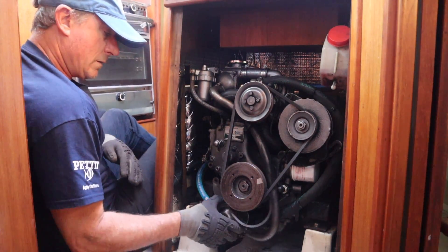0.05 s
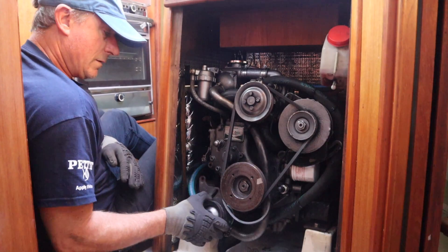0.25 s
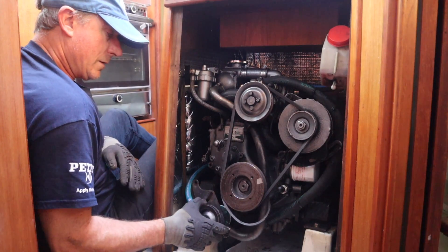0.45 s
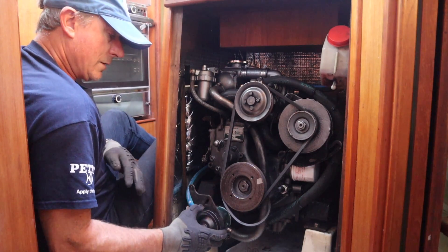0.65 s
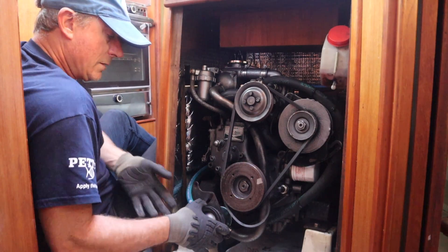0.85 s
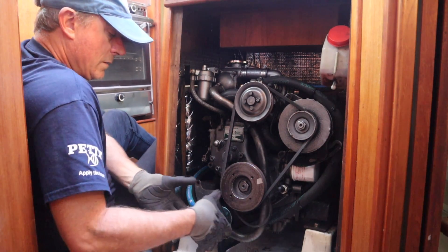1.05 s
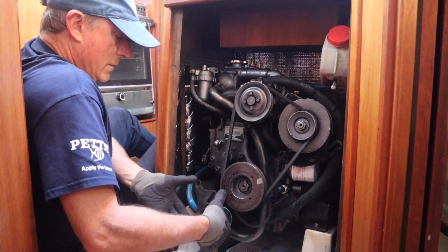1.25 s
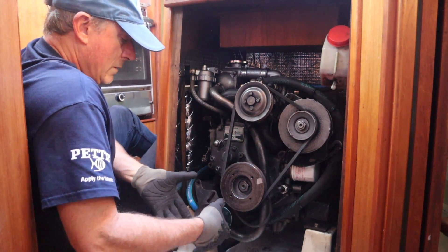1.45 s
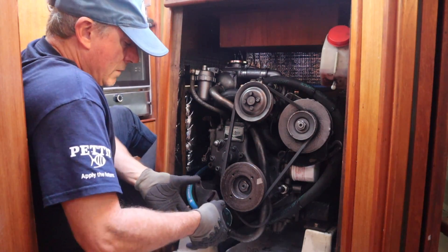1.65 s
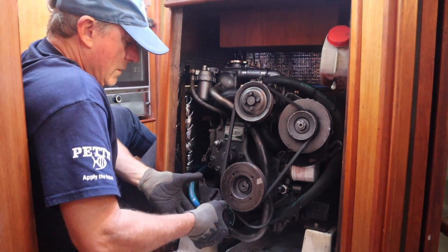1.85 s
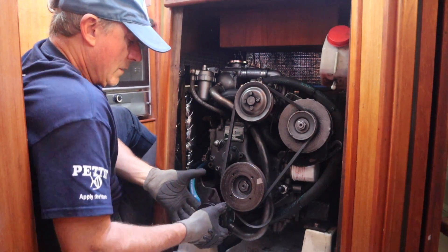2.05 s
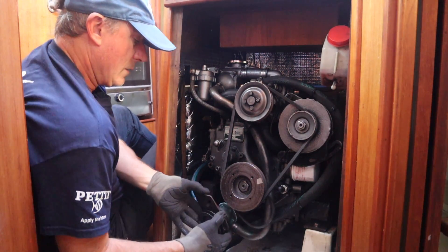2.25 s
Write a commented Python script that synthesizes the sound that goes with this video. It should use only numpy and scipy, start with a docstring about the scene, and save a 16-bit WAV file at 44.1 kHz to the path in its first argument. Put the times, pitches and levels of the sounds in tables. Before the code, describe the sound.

A heavy clunk of a pulley coming free at 0.24 seconds: sharp crack, dull steel ring and deep hollow boom, with loose parts rattling and softer rebounds at 0.37 and 0.44. The short cabin tail fades into low rumble. Gloves rub faintly, soft bumps come near 0.85 and 1.4, a tick at 1.56, then thuds, clicks and juddering rubber scrapes from 1.95 to 2.3.

```python
"""Belt and pulley in a boat cabin

Gloved hands work a belt and pulley off a stopped diesel engine in a wooden boat cabin.
The pulley comes free with a crack (noise burst) and a deep boom of the engine bay (decaying modes).
Metal parts tick (noise puffs, wavering sines), gloves, sleeves and the rubber belt rub (grainy noise),
and soft bumps (short sines) sound over a low noise rumble. The microphone pair is wide in the treble."""
import sys
import numpy as np
from scipy import signal
from scipy.fft import rfft, irfft, next_fast_len
from scipy.io import wavfile
from scipy.ndimage import map_coordinates

SR = 44100
rng = np.random.default_rng(int(sys.argv[2]) if len(sys.argv) > 2 else 0)


def master(y):
    """Save y as 16-bit WAV."""
    cut = np.clip(np.atleast_2d(y).T, -1, 1)
    pcm = np.round(cut * 32767)  # scale
    wavfile.write(sys.argv[1], SR, pcm.astype(np.int16))


N = 101429
T = np.arange(N) / SR  # time [s]

# Spectra are relative: noise is scaled to rms 1 before its level is set.
# Background in the cabin: (frequency [Hz], density [dB per Hz])
FLOOR_SPECTRUM = [(20, -3), (45, -2.5), (72, 3.5), (110, -3.5), (200, -8), (300, -11.5), (600, -14),
                  (1200, -21), (2500, -29), (6000, -39), (11000, -47)]
FLOOR_DB = -43  # before its slow waver

# Gloves and sleeves sliding: (time [s], level before flutter [dB])
RUB_LEVELS = [(0, -63.5), (.1, -55.5), (.17, -53), (.3, -51), (.55, -73), (.75, -59), (.86, -55),
              (.92, -55.5), (1.1, -53), (1.17, -52.5), (1.26, -46.5), (1.39, -47), (1.47, -56.5),
              (1.7, -60.5), (1.77, -50), (1.89, -57.5), (2.02, -53.5), (2.3, -50)]
# Cloth on metal and rubber: (frequency [Hz], density [dB per Hz])
CLOTH_SPECTRUM = [(150, -38), (500, -1.5), (1000, 2.5), (1800, -0.5), (3500, -7), (6000, -14.5),
                  (10500, -19), (13000, -25)]
# Light brushing of the sleeves: (peak time [s], level [dB], rise [s], fall [s])
BRUSH_STROKES = [(.86, -57.5, 0.024, 0.024), (1.05, -55.5, 0.098, 0.075), (1.32, -57, 0.13, 0.051)]
# Fine hiss of the sleeves: (frequency [Hz], density [dB per Hz])
BRUSH_SPECTRUM = [(1000, -22), (4000, 1), (7000, 2), (11000, 0)]

# Light metal contacts: (time [s], puff level [dB], ring [Hz], ring level before wavering [dB], t60 [s])
TICK_CONTACTS = [(0.12, -53.5, 1920, -48, 0.19), (0.147, -50.5, 4440, -46, 0.19),
                 (.216, -46, 7600, -48, 0.099), (0.355, -47, 4350, -54, 0.03),
                 (0.3633, -46.5, 4480, -50, 0.076), (0.475, -50.5, 5340, -57, 0.16),
                 (1.5595, -37, 4360, -45, 0.032), (1.679, -48.5, 7500, -66, 0.038),
                 (1.75, -49, 7500, -61, 0.12), (1.963, -45, 4500, -51, 0.047),
                 (2.1146, -35, 3850, -29.5, 0.01), (2.2344, -34, 4700, -28, 0.0083),
                 (2.275, -42, 5260, -43.5, 0.015)]
# Puff of a metal contact: (frequency [Hz], density [dB per Hz])
TICK_SPECTRUM = [(500, -3), (1500, 2.5), (4000, 0.5), (6000, -2.5), (11000, -3.5)]

# Loose parts rattling: (time [s], level [dB])
RATTLE_HITS = [(.2525, -32), (.2615, -32), (.2655, -34), (.272, -37), (.279, -36), (.3572, -36),
               (.3675, -29), (.1275, -39), (2.052, -45)]
# Colour of the loose parts: (frequency [Hz], density [dB per Hz])
RATTLE_SPECTRUM = [(300, -23), (1000, -1), (2100, 12), (3500, -10), (6000, -13), (11000, -25)]
RATTLE_T60_S = 0.016
RATTLE_ROOM_DB, RATTLE_ROOM_T60_S = -21.5, 0.21  # room level is relative to each hit

KNOCK_S = 0.2368  # the pulley comes free
KNOCK_SIDE_DB = -5  # side gain of rattle, crack and cabin, before the pair's width
# Crack of the blow: (frequency [Hz], density [dB per Hz])
CRACK_SPECTRUM = [(200, -21), (500, 7.5), (1200, -5), (2000, 1.5), (3200, 6), (3700, -5.5), (4300, -1.5),
                  (5500, -13.5), (11000, -27)]
CRACK_DB, CRACK_T60_S = -17, 0.031
# Modes of the engine bay: (frequency [Hz], level before BAY_DB [dB], t60 [s])
BAY_MODES = [(45.9, -21, .47), (47.5, -29.5, .86), (67.7, -10.5, .4), (69.9, -18.5, 1.0), (87.4, -14, .55),
             (92.3, -14.3, .96), (105.7, -10.8, .48), (139, -5.8, .39), (141.8, -19.7, .66),
             (164.3, 1, .16), (185.2, -22.8, .95), (237, -17.5, .22)]
BAY_DB = -0.5
# The slack belt rebounds softly: (time [s], level relative to the main blow [dB])
BELT_REBOUNDS = [(.3697, -16.6), (.4387, -23)]
# Modes of the pulley and its bracket: (frequency [Hz], level before STEEL_DB [dB], t60 [s])
STEEL_MODES = [(395, -23.5, .28), (475, -22, .15), (560, -28.5, .24), (754, -26.5, .16), (840, -26.5, .13),
               (912, -24, .12), (1148, -27, .1), (1249, -33, .15), (1470, -38, .24), (1895, -27.5, .1),
               (2330, -33, .13), (2570, -34, .11), (3117, -32, .045), (4250, -26.5, .055)]
STEEL_DB = -2
BUILD_CYCLES = 1.3  # time constant of a mode's swell, in its own cycles
# The cabin's answer: (frequency [Hz], density [dB per Hz])
ANSWER_SPECTRUM = [(20, -38), (45, 9), (80, 14.5), (170, 7), (260, 5), (500, 1.5), (800, -7), (2400, -21.5),
                   (5000, -26.5), (11000, -26)]
ANSWER_DB = -19
# Decay of the cabin: (frequency [Hz], t60 [s])
CABIN_DECAY = [(60, 0.77), (170, 0.49), (400, 0.34), (2000, 0.36), (10000, 0.047)]

# Soft bumps of hand and belt against the engine: (time [s], level [dB], pitch [Hz])
BUMP_HITS = [(0.834, -35, 79), (0.925, -34, 79), (1.413, -37.5, 85), (1.42, -40.5, 166), (1.47, -40.5, 222),
             (1.964, -30.5, 80), (2.121, -35.5, 155), (2.126, -34, 223), (2.197, -30, 87),
             (2.252, -26, 123)]
BUMP_T60_S = 0.2

# Belt dragging over the pulley: (peak time [s], level before judder [dB], rise [s], fall [s])
SCRAPE_STROKES = [(2.01, -39.5, 0.04, 0.046), (2.129, -42, 0.02, 0.018), (2.268, -32, 0.044, 0.043)]
# Belt catching and letting go: (time [s], level [dB])
BELT_SLIPS = [(2.002, -43), (2.2565, -37)]
SLIP_T60_S = 0.085
# Rubber on the pulley: (frequency [Hz], density [dB per Hz])
BELT_SPECTRUM = [(100, -1.5), (265, 0.5), (320, -1.5), (398, 4.5), (650, -7.5), (920, 0.5), (1150, -13),
                 (1440, -10.5), (2600, -18.5), (5000, -26.5), (11000, -48)]

# Width of the microphone pair: (frequency [Hz], gain of side over mid [dB])
PAIR_WIDTH = [(60, -35), (150, -12.5), (300, -4), (600, -2), (1200, 1.5), (2500, 3.5), (5000, 5.5),
              (9000, 7.5)]
LEFT_LEAD_S, LEAD_BELOW_HZ = 0.00006, 480  # in the bass, the left microphone hears the mid sound first
TOP_HZ = 11500  # band limit of the recorder


def amp(db):
    """Decibels to gain."""
    return 10 ** (np.asarray(db) / 20)


def unit(x):
    """Scale to rms 1."""
    return x / np.sqrt(np.mean(x ** 2) + 1e-20)


def along(points, hz):
    """Interpolate (Hz, value) points on a log frequency axis."""
    f, v = np.transpose(points)
    return np.interp(np.log(hz + 1), np.log(f + 1), v)


def filtered(x, response):
    """Multiply the spectrum of x by a response of frequency."""
    m = next_fast_len(N + 8192)
    hz = np.fft.rfftfreq(m, 1 / SR)
    return irfft(rfft(x, m) * response(hz), m)[..., :N]


def coloured(x, spectrum):
    """Shape x by a spectrum, at rms 1."""
    return unit(filtered(x, lambda hz: amp(along(spectrum, hz))))


def noise(spectrum):
    """Independent mid and side noise with a spectrum."""
    return coloured(rng.standard_normal((2, N)), spectrum)


def wobble(rate):
    """A smooth random curve, rate knots a second."""
    knots = rng.standard_normal(int(N * rate / SR) + 4)
    return map_coordinates(knots, [T * rate])


def strike(s, t60, attack):
    """Envelope of a contact at time s: a fast rise, then an exponential decay."""
    t = np.maximum(T - s, 0)
    return (1 - np.exp(-t / attack)) * amp(-60 * t / t60)


def strokes(rows):
    """Envelope of sliding strokes that swell and fade."""
    envelope = np.zeros(N)
    for s, db, rise, fall in rows:
        width = np.where(T < s, rise, fall)
        envelope += amp(db) * np.exp(-((T - s) / width) ** 2)
    return envelope


def friction(spectrum, slips_per_s, smooth):
    """Tiny slips of random size over a smooth hiss."""
    slips = (rng.random(N) < slips_per_s / SR) * rng.standard_normal((2, N))
    hiss = smooth * rng.standard_normal((2, N))
    return coloured(unit(slips) + hiss, spectrum)


def modes(table, s):
    """A body's modes, swelling and dying away after a blow at time s."""
    ringing = np.zeros(N)
    for k, (hz, db, t60) in enumerate(table):
        sign = (-1) ** k  # neighbouring modes start in opposite directions
        shape = strike(s, t60, BUILD_CYCLES / hz)
        ringing += sign * amp(db) * shape * np.sin(2 * np.pi * hz * (T - s))
    return ringing


def in_middle(x):
    """Put a mono sound in mid only."""
    return x * np.array([[1], [0]])


def background(waver_db=1.3):
    """Low rumble and faint hiss in the cabin: noise whose level wavers slowly."""
    return amp(FLOOR_DB + waver_db * wobble(7.2)) * noise(FLOOR_SPECTRUM)


def gloves(flutter_db=1.0):
    """Cloth slides unevenly over metal and rubber; the sleeves add a fine hiss."""
    level_db = np.interp(T, *np.transpose(RUB_LEVELS)) + flutter_db * wobble(70)
    cloth = amp(level_db) * friction(CLOTH_SPECTRUM, slips_per_s=3500, smooth=1.4)
    sleeves = strokes(BRUSH_STROKES) * friction(BRUSH_SPECTRUM, slips_per_s=4000, smooth=0.75)
    return cloth + sleeves


def ticks(drift_rad=0.36, waver_db=5.9, room_db=-19, room_t60=0.37):
    """Each metal contact is a puff of noise and one wavering ringing note, with a little cabin sound."""
    puffs, rings = np.zeros(N), np.zeros((2, N))
    for s, db, hz, ring_db, t60 in TICK_CONTACTS:
        shape = strike(s, t60, 0.00055)
        room = amp(room_db) * strike(s, room_t60, 0.0017)
        puffs += amp(db) * (shape + room)
        # mid and side waver in phase separately
        phase = 2 * np.pi * hz * T + drift_rad * np.array([wobble(230), wobble(260)])
        ring_level = amp(ring_db + waver_db * wobble(160))
        start = rng.uniform(0, 2 * np.pi, (2, 1))
        rings += ring_level * shape * np.sin(phase + start)
    return puffs * noise(TICK_SPECTRUM) + rings * [[1], [0.6]]


def rattle():
    """Loose parts give very short noise bursts, each with a weaker, longer room tail."""
    envelope = np.zeros(N)
    for s, db in RATTLE_HITS:
        direct = strike(s, RATTLE_T60_S, 0.00024)
        room = amp(RATTLE_ROOM_DB) * strike(s, RATTLE_ROOM_T60_S, 0.0018)
        envelope += amp(db) * (direct + room)
    return noise(RATTLE_SPECTRUM) * envelope * amp([[0], [KNOCK_SIDE_DB]])


def crack():
    """The pulley comes free with a sharp, quickly decaying burst of noise."""
    burst = noise(CRACK_SPECTRUM) * strike(KNOCK_S, CRACK_T60_S, 0.00076)
    return amp(CRACK_DB) * burst * amp([[0], [KNOCK_SIDE_DB]])


def engine_bay():
    """The bay's low modes boom at the blow, and again more softly as the slack belt rebounds."""
    ringing = modes(BAY_MODES, KNOCK_S)
    for s, db in BELT_REBOUNDS:
        ringing += amp(db) * modes(BAY_MODES, s)
    return in_middle(amp(BAY_DB) * ringing)


def pulley_clank():
    """The pulley and its bracket ring in decaying steel modes after the blow."""
    return in_middle(amp(STEEL_DB) * modes(STEEL_MODES, KNOCK_S))


def cabin_answer():
    """The cabin answers the blow with diffuse noise, each frequency decaying at its own rate."""
    hz, t, z = signal.stft(noise(ANSWER_SPECTRUM), SR, nperseg=512)
    fade = amp(-60 * np.maximum(t - KNOCK_S, 0) / along(CABIN_DECAY, hz)[:, None])
    tail = signal.istft(z * fade, SR, nperseg=512)[1][:, :N]
    onset = np.clip((T - KNOCK_S) / 0.005, 0, 1)
    return amp(ANSWER_DB) * tail * onset * amp([[0], [KNOCK_SIDE_DB]])


def bumps():
    """Soft contacts give a dull, short thud: a decaying low sine."""
    thuds = np.zeros(N)
    for s, db, hz in BUMP_HITS:
        thuds += amp(db) * strike(s, BUMP_T60_S, 0.0013) * np.sin(2 * np.pi * hz * (T - s))
    return in_middle(thuds)


def belt(judder_db=1.0, side_db=-2):
    """Rubber drags in short juddering strokes, with a soft knock each time it lets go."""
    drag = strokes(SCRAPE_STROKES) * amp(judder_db * wobble(120))
    slips = sum(amp(db) * strike(s, SLIP_T60_S, 0.0023) for s, db in BELT_SLIPS)
    rubber = friction(BELT_SPECTRUM, slips_per_s=1800, smooth=0.74)
    return (drag + slips) * rubber * amp([[0], [side_db]])


def scene():
    """All sources on a microphone pair that is nearly mono in the bass and very wide in the treble."""
    blow = engine_bay() + pulley_clank() + crack() + rattle() + cabin_answer()
    handling = ticks() + bumps() + gloves() + belt()
    mid, side = blow + handling + background()
    side = filtered(side, lambda hz: amp(along(PAIR_WIDTH, hz)))
    # a differentiated mid in the side channel makes the left lead in the bass
    lead = filtered(mid, lambda hz: 1j * np.pi * hz * LEFT_LEAD_S / (1 + (hz / LEAD_BELOW_HZ) ** 4))
    side = side + lead
    return np.array([mid + side, mid - side])


def record(dry):
    """The recorder clips at full scale, then falls off steeply above its band limit."""
    clipped = np.clip(dry, -1, 1)
    return filtered(clipped, lambda hz: 1 / np.sqrt(1 + (hz / TOP_HZ) ** 48))


dry = scene()
out = record(dry)
master(out)
```